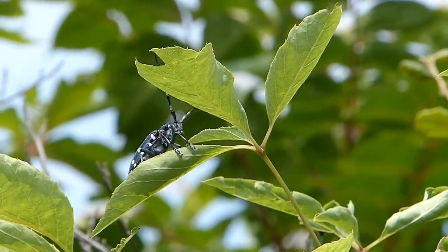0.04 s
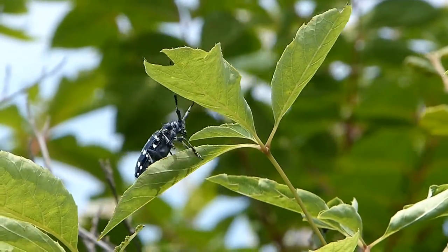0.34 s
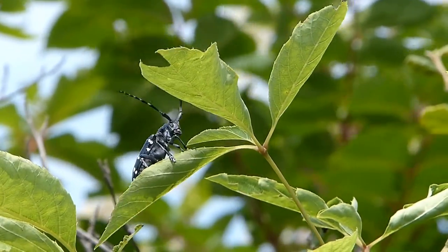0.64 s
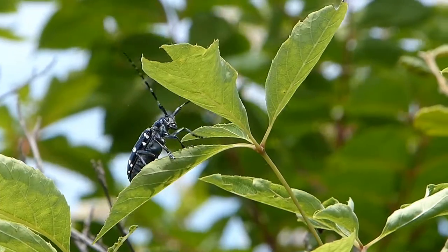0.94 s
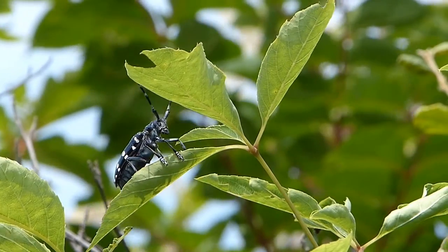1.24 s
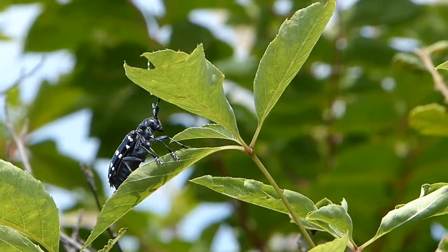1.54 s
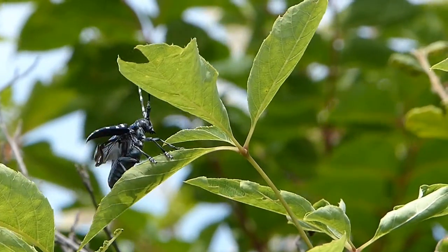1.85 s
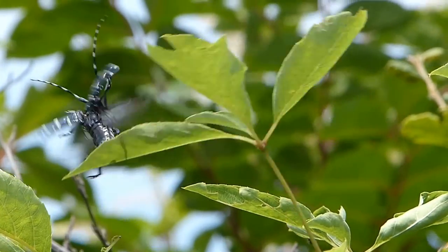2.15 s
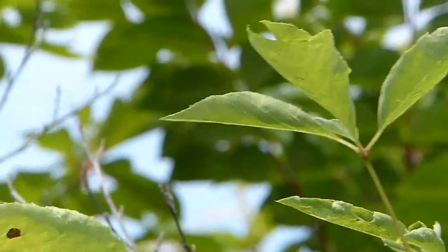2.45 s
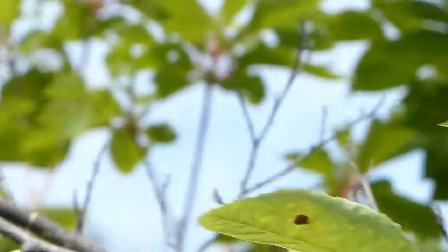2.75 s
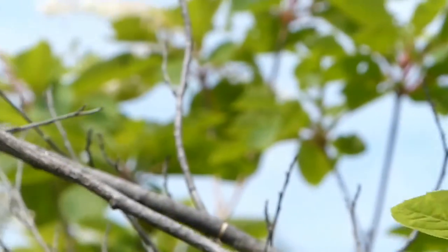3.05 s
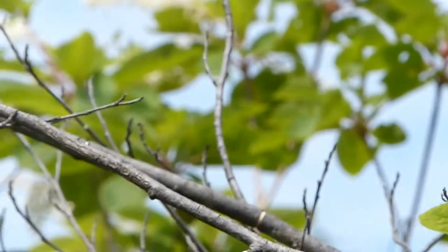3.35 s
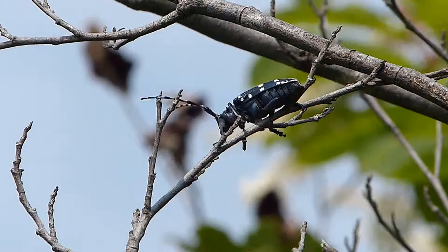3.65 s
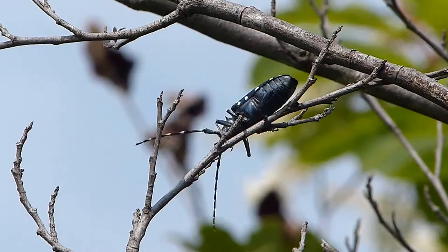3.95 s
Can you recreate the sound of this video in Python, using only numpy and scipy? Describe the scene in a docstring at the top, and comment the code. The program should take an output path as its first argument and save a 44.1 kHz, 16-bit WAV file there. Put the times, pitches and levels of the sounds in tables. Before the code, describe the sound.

Cicadas buzz loudly throughout, near ones rattling shrilly over a distant chorus and swelling around 2.5 seconds. A higher insect lisps about five times a second. Underneath, a camera lens whirrs faintly, with a few dry ticks before 1.5 seconds and soft stepping from 2.5 to 3.5. At 3.65 the sound cuts out for a tenth of a second, returning with a soft thump and one faint, distant bird chirp.

```python
"""Cicadas in summer trees. The nearest snap their tymbals in double clicks about 48 times a second,
ringing their hollow bodies over a chorus of others, scattered by the leaves. A higher insect lisps five
times a second; a far bird chirps once. A camera's lens drive whirrs and steps faintly in its case, with
a few dry ticks, over outdoor air and a low hum. Near the end the sound drops out for a tenth of a second
and returns with a soft thump."""
import sys
import numpy as np
from scipy import signal
from scipy.fft import rfft, irfft, next_fast_len
from scipy.io import wavfile
from scipy.ndimage import uniform_filter1d

SR = 44100
rng = np.random.default_rng(int(sys.argv[2]) if len(sys.argv) > 2 else 0)


def wav_out(sig):
    """Save sig, one row per channel (or a flat mono array), as 16-bit PCM at SR to the path in sys.argv[1]."""
    wavfile.write(sys.argv[1], SR, np.round(np.clip(np.atleast_2d(sig).T, -1, 1) * 32767).astype(np.int16))


N = 176400

# Near cicadas, pace from song start to end (time [s], stroke rate [1/s])
LEAD_PACE = [(.0195, 48.62), (.8, 48.53), (1.8, 48.54), (2.15, 48.67), (2.6, 48.42), (3.65, 48.40)]
RIVAL_PACE = [(.0139, 48.45), (1.0, 48.36), (1.5, 48.4)]
THIRD_PACE = [(1.9193, 47.0), (2.36, 47.0)]
FOURTH_PACE = [(3.3532, 47.8), (3.65, 47.7)]
LATE_PACE = [(3.7541, 47.6), (3.85, 48.0), (4.02, 47.2)]
# Near cicadas, song strength (time [s], level [dB])
LEAD_LEVEL = [(0, -14), (.5, -8), (.85, -4.5), (1.4, -3.5), (1.6, -6), (2.0, -9.5), (2.3, -2), (2.5, 2.5),
              (2.9, 1), (3.2, -2.5), (3.6, -2)]
RIVAL_LEVEL = [(0, -1.5), (.25, -1), (.5, -1), (.7, -.5), (1.0, -4), (1.27, -3), (1.5, -8.5)]
THIRD_LEVEL = [(1.92, -9), (1.96, -5), (2.1, -10.5), (2.3, -7), (2.36, -17)]
FOURTH_LEVEL = [(3.35, -6), (3.4, -2), (3.5, -4), (3.6, 1.5), (3.65, -10)]
LATE_LEVEL = [(3.75, 0.77), (4, 1.4)]
# Clicks of one tymbal stroke (lag from first strong click [s], level [dB])
STROKE_CLICKS = [(-.0025, -17), (0, -4), (.0024, -2), (.005, -14.5)]
# Colour around the body ring: in the open, behind leaves, late singer (frequency [Hz], gain [dB])
OPEN_EQ = [(1000, -43), (2800, -27.5), (3500, -17), (4200, -12), (4900, -8), (5600, -2), (6500, 4.5),
           (7450, 2), (8000, -6), (8600, -4), (10000, -18.5), (14000, -32)]
SHADED_EQ = [(1000, -50), (2800, -41), (3500, -25.5), (4200, -6.5), (4900, 1), (5600, -0.5), (6500, -6.5),
             (7450, 3), (8000, -8), (10000, -19.5), (14000, -31)]
LATE_EQ = [(1000, -40), (2800, -19.5), (3500, -12.5), (4200, -5), (4900, -5.5), (5600, -1.5), (6500, 2),
           (7450, 3.5), (8000, 1.5), (8600, 1), (10000, -17), (14000, -27.5)]
# Chorus cicadas (stroke rate [1/s], body pitch [Hz], level [dB])
FAR_CICADAS = [(47.68, 4886, -1), (47.3, 4720, -6), (47.64, 4760, -9), (45.95, 4810, -4.5),
               (49.16, 4610, 0), (47.4, 5410, -6.5), (45.93, 5100, -9.5), (50.7, 4670, -4)]
# Colour of the chorus voices and of the farthest, merged ones (frequency [Hz], gain [dB])
CHORUS_EQ = [(1500, -50), (2800, -23), (3350, -18.5), (3800, -6.5), (4300, -5.5), (4900, 1.5), (5400, 0),
             (6000, -1), (6700, -6), (7500, -4.5), (8200, -10), (10500, -19), (12500, -28), (14000, -51)]
HAZE_EQ = [(1500, -64), (2800, -28.5), (3400, -20), (4000, -6.5), (4900, 0.5), (5600, -1.5), (6500, -9),
           (7500, -12), (8200, -19), (10500, -24.5), (12500, -43), (14000, -62)]
# Chorus swell (time [s], level [dB], left minus right [dB])
CHORUS_SWELL = [(0, -40, 2), (.25, -40, -0.73), (.55, -41, -1), (.85, -38, -1.5), (1.3, -39.5, -1),
                (1.6, -40.5, 0.26), (1.9, -41, -0.74), (2.2, -40, -0.28), (2.6, -39.5, 1.2),
                (3.0, -39.5, 0.68), (3.45, -38, -.5), (3.64, -41, 0.29), (3.76, -43.5, -1.5), (4, -41.5, 0)]
# Lisps of the high insect (peak time [s], length [s], level [dB])
LISP_EVENTS = [(0.086, 0.1, -8), (0.312, 0.15, -11), (0.553, 0.22, -8), (0.775, .13, -4), (0.981, 0.1, -2),
               (1.173, 0.16, -7), (1.38, 0.18, -9), (1.606, 0.21, -14), (1.784, 0.18, -9),
               (1.972, 0.13, -7.5), (2.16, 0.11, -4.5), (2.357, 0.089, -4.5), (2.551, 0.079, -0.5),
               (2.744, 0.085, -3), (2.924, .1, -2), (3.126, 0.088, -2), (3.331, 0.083, -2),
               (3.533, 0.13, -6.5), (3.898, 0.091, -2)]
# Lisp colour (frequency [Hz], gain [dB])
LISP_EQ = [(7500, -14.5), (9000, -4.5), (9700, 1.5), (10000, 2), (10400, 1), (11200, -2), (12400, -6.5),
           (13200, -27), (15000, -40), (16000, -46.5)]
# Lens drive effort (time [s], level [dB])
DRIVE_EFFORT = [(0, 1), (.2, -2.5), (.45, -0.5), (.58, 0), (.7, -2), (1.4, 0.5), (1.7, -2), (2.35, -1),
                (2.48, 6.5), (2.6, 1), (2.9, 2), (3.2, 2), (3.53, 2), (3.63, 1), (4, 2)]
# Whirr colour (frequency [Hz], gain [dB])
WHIRR_EQ = [(60, -33), (150, -12), (260, 5), (600, 2), (1000, -1), (1250, -3.5), (1700, -9), (2600, -19.5),
            (5000, -29.5)]
# Case modes under the whirr (frequency [Hz], width [Hz], antiphase level [dB], in-phase level [dB])
CASE_MODES = [(269.4, 31, -17, -24.5), (589.5, 29, -13, -8), (717, 39, -0.5, -14), (793, 73, -9, -9),
              (851, 68, -5, -12), (956, 22, -1.5, -13.5), (1057, 43, -5.5, -15.5)]
# Case modes under a step (frequency [Hz], decay [s], antiphase level [dB], in-phase level [dB])
CASE_STEP_MODES = [(719, 0.0071, 2, -15), (806, .007, -4, -1.5), (965, 0.0052, 7.5, -13)]
# Lens: focus hunting strength, single hard steps, short moves (time [s], level [dB])
HUNT_LEVEL = [(2.56, -3), (2.75, -2), (2.9, 1), (3.18, 1), (3.3, -1), (3.46, -6)]
LENS_JOLTS = [(.108, 5), (.559, -3), (.594, 1.5), (1.109, -1), (2.412, -4), (2.475, 1), (2.488, 5),
              (2.796, 5.5), (2.946, 3), (2.988, 6), (3.140, 2.5), (3.506, 7)]
LENS_MOVES = [(.1, -4), (.49, -5), (.59, -4), (1.11, 0), (1.62, 3), (1.79, 3), (1.905, 1), (2.085, 0),
              (2.238, 3), (2.475, 3), (2.79, -3), (3.16, 1)]
# Dry ticks (time [s], level [dB])
TICK_EVENTS = [(.11, -2), (.328, -6), (.585, -15), (1.225, -4), (1.275, 0), (1.49, 0.5)]
# Colour of the ticks and of the air (frequency [Hz], gain [dB])
TICK_EQ = [(500, -15), (1300, -5), (2200, -4), (3500, -8), (8000, -31)]
AIR_EQ = [(25, -8), (70, -5.5), (120, 0), (170, -1.5), (500, 4), (900, -7.5), (1300, 0.5), (2500, -7.5),
          (6000, -19.5)]


def near_cicada(pace, level, body_eq, body_hz, pan_db, jitter_s=.00005, scatter_db=2.54):
    """Each tymbal stroke: two sharp falling clicks between weaker ones, ringing the hollow body."""
    t = np.arange(pace[0][0], pace[-1][0], 1 / SR)
    cycles = np.cumsum(curve(pace, t)) / SR
    stroke_s = np.interp(np.arange(cycles[-1]), cycles, t)[:, None]
    lag_s, click_db = np.array(STROKE_CLICKS).T
    jitter, scatter = rng.standard_normal((2, len(stroke_s), len(lag_s)))
    snap_db = curve(level, stroke_s)[:, None] + click_db + scatter_db * scatter
    snaps = clicks(stroke_s + lag_s + jitter_s * jitter, snap_db)
    body = colour(mode(sag(snaps), body_hz, decay_s=.00055), body_eq)
    return undb(-18) * pan(pan_db) * leaves(body, t60_s=.037, tail_db=-4.5)


def far_cicada(rate_hz, body_hz, ribs=5, strokes=230, rib_gap_s=.0029, rib_fade_db=2.4,
               jitter_s=.0002, scatter_db=2):
    """Each stroke buckles a run of ribs; their clicks ring the body."""
    rib = np.arange(ribs)
    jitter, scatter = rng.standard_normal((2, strokes, ribs))
    stroke_s = (np.arange(strokes)[:, None] - rng.random()) / rate_hz
    snap_s = stroke_s + rib * rib_gap_s + jitter_s * jitter
    snaps = clicks(snap_s, scatter_db * scatter - rib_fade_db * rib)
    return unit(mode(sag(snaps), body_hz, decay_s=.00077))


def chorus():
    """Far cicadas blurred by the trees, the farthest merged to a hiss; all swell and ebb together."""
    voices = sum(undb(db) * leaves(far_cicada(rate_hz, body_hz), t60_s=.14, tail_db=-5.5)
                 for rate_hz, body_hz, db in FAR_CICADAS)
    haze = undb(-5) * unit(colour(stereo_noise(width=.8), HAZE_EQ))
    swell_db, pan_db = curve(CHORUS_SWELL)
    return (unit(colour(voices, CHORUS_EQ)) + haze) * undb(swell_db) * pan(pan_db)


def lisping_insect(rise_share=.5, fall_share=.38, steepness=6.4, bed_db=-6.5, grain_db=.5):
    """Short swells of very high, grainy rasping over a steady bed of farther insects."""
    t = np.arange(N) / SR
    swell = undb(bed_db)
    for peak_s, length_s, db in LISP_EVENTS:
        away = np.maximum((peak_s - t) / rise_share, (t - peak_s) / fall_share) / length_s
        swell = swell + undb(db) * np.exp(-np.minimum(away, 2) ** steepness)
    rasp = stereo_noise(width=1) * undb(grain_db * walk(rate_hz=700))
    return undb(-54.5) * pan(3) * swell * unit(colour(rasp, LISP_EQ))


def lens_drive(flutter_db=1.5):
    """A fluttering whirr rings the camera case, shaking its two ports mostly in antiphase."""
    effort_db = curve(DRIVE_EFFORT)
    case = 0
    for hz, width_hz, antiphase_db, inphase_db in CASE_MODES:
        push = rng.standard_normal((2, N)) * undb(effort_db + flutter_db * walk(rate_hz=30))
        side, mid = unit(mode(push, hz, decay_s=1 / (np.pi * width_hz)))
        case = case + undb(antiphase_db) * antiphase(side) + undb(inphase_db) * mid
    whirr = unit(colour(rng.standard_normal(N), WHIRR_EQ)) * undb(.4 * effort_db)
    return undb(-58.5) * case + undb(-55.5) * antiphase(whirr)


def lens_steps(hunt_start_s=2.5715, period_s=.05, pair_gap_s=.0172, push_s=.0014, scatter_db=2):
    """Focus hunting: a purr of paired steps, plus single hard jolts. Each step rings the case."""
    pair_s = np.arange(hunt_start_s, HUNT_LEVEL[-1][0], period_s)[:, None] + [0, pair_gap_s]
    pair_db = curve(HUNT_LEVEL, pair_s) + scatter_db * rng.standard_normal(pair_s.shape)
    steps = clicks(pair_s, pair_db) + clicks(*np.array(LENS_JOLTS).T)
    t = np.arange(SR // 10) / SR
    attack = 1 - np.exp(-(t / push_s) ** 2)
    case = 0
    for hz, decay_s, antiphase_db, inphase_db in CASE_STEP_MODES:
        tone = attack * np.exp(-t / decay_s + 2j * np.pi * hz * t)
        response = undb(inphase_db) * tone.real + undb(antiphase_db) * antiphase(tone.imag)
        case = case + ring(steps, response)
    return undb(-47) * case


def lens_moves(rise_s=.0082):
    """Each short lens move rubs a low case resonance."""
    t = np.arange(SR // 5) / SR
    push = ring(clicks(*np.array(LENS_MOVES).T), t / rise_s * np.exp(1 - t / rise_s))
    rub = unit(mode(rng.standard_normal(N), hz=578, decay_s=.016))
    return undb(-59) * push * rub


def ticks(decay_s=.0057):
    """Faint dry ticks, as of fingers on the camera."""
    t = np.arange(SR // 10) / SR
    touch = ring(clicks(*np.array(TICK_EVENTS).T), np.exp(-t / decay_s))
    return undb(-54.5) * touch * unit(colour(rng.standard_normal((2, N)), TICK_EQ))


def bird(start_s=3.783, length_s=.085, start_hz=2850, rise_hz_per_s=10500):
    """One faint, far, rising chirp."""
    t = np.clip(np.arange(N) / SR - start_s, 0, length_s)
    hz = start_hz + rise_hz_per_s * t
    return undb(-60.5) * np.sin(np.pi * t / length_s) * np.sin(2 * np.pi * np.cumsum(hz) / SR)


def air(hum_hz=121, waver_share=.0191):
    """Faint, even outdoor noise with a low, wavering hum."""
    hz = hum_hz * (1 + waver_share * walk(rate_hz=6.12))
    hum = np.sqrt(2) * np.sin(2 * np.pi * np.cumsum(hz) / SR)
    return undb(-63.5) * unit(colour(stereo_noise(width=.51), AIR_EQ)) + undb(-83) * hum


def sag(x, delay_s=.001204, corner_hz=4865):
    """Delay the lows, so each click sweeps down in pitch."""
    size = next_fast_len(N + 4096)
    hz = np.arange(size // 2 + 1) * SR / size
    lag_s = delay_s / (1 + (hz / corner_hz) ** 10)
    phase_rad = 2 * np.pi * np.cumsum(lag_s) * SR / size
    return irfft(rfft(x, size) * np.exp(-1j * phase_rad), size)[:N]


def leaves(x, t60_s, tail_db):
    """Direct sound plus a short scatter off foliage, different at each ear."""
    t = np.arange(SR // 4) / SR
    tail = rng.standard_normal((2, len(t))) * np.exp(-np.log(1000) * t / t60_s)
    tail /= np.sqrt(np.sum(tail ** 2, axis=1, keepdims=True))
    return x + undb(tail_db) * ring(x, tail)


def clicks(times_s, db):
    """Impulses at given times and levels."""
    at = np.round(times_s * SR).astype(int).ravel()
    inside = (at >= 0) & (at < N)
    return np.bincount(at[inside], undb(db).ravel()[inside], N)


def mode(x, hz, decay_s):
    """One damped resonance."""
    t = np.arange(int(10 * decay_s * SR)) / SR
    return ring(x, np.exp(-t / decay_s) * np.sin(2 * np.pi * hz * t))


def ring(x, response):
    """Convolve with an impulse response."""
    return signal.fftconvolve(np.atleast_2d(x), np.atleast_2d(response), axes=1)[:, :N]


def colour(x, eq):
    """Zero-phase filter through (frequency [Hz], gain [dB]) points."""
    hz, db = np.array(eq, float).T
    size = next_fast_len(N + 4096)
    bin_hz = np.arange(size // 2 + 1) * SR / size
    gain = undb(np.interp(np.log(bin_hz + 1), np.log(hz), db))
    return irfft(rfft(np.atleast_2d(x), size) * gain, size)[:, :N]


def stereo_noise(width):
    """Common white noise plus a separate part per ear."""
    return rng.standard_normal(N) + width * rng.standard_normal((2, N))


def walk(rate_hz):
    """Smooth random drift, rms 1."""
    hold = max(int(SR / rate_hz), 1)
    stairs = np.repeat(rng.standard_normal(N // hold + 1), hold)
    return unit(uniform_filter1d(stairs, hold)[:N])


def curve(rows, at_s=None):
    """Table columns, interpolated linearly in time."""
    times_s, *columns = np.array(rows, float).T
    at_s = np.arange(N) / SR if at_s is None else at_s
    return np.squeeze([np.interp(at_s, times_s, column) for column in columns])


def pan(db):
    """Channel gains for a left-minus-right level."""
    return undb(np.array([db, -db]).reshape(2, -1) / 2)


def antiphase(x):
    """Left as is, right inverted."""
    return x * np.array([[1], [-1]])


def undb(db):
    """Decibels to gain."""
    return 10 ** (np.asarray(db) / 20)


def unit(x):
    """Scale to rms 1."""
    return x / np.sqrt(np.mean(x ** 2))


def scene():
    """Five near cicadas, chorus, high insect, bird, camera and air."""
    near = (near_cicada(LEAD_PACE, LEAD_LEVEL, OPEN_EQ, body_hz=4904, pan_db=-1.5)
            + near_cicada(RIVAL_PACE, RIVAL_LEVEL, SHADED_EQ, body_hz=4980, pan_db=-2.5)
            + near_cicada(THIRD_PACE, THIRD_LEVEL, SHADED_EQ, body_hz=4860, pan_db=-1)
            + near_cicada(FOURTH_PACE, FOURTH_LEVEL, SHADED_EQ, body_hz=4860, pan_db=0)
            + near_cicada(LATE_PACE, LATE_LEVEL, LATE_EQ, body_hz=4710, pan_db=-1.5))
    wildlife = near + chorus() + lisping_insect() + bird()
    camera = lens_drive() + lens_moves() + lens_steps() + ticks()
    return wildlife + camera + air()


def record(dry, off_s=3.648, on_s=3.7545, fade_s=.008, thump_decay_s=.19, top_hz=15600):
    """The sound drops out briefly and returns with a soft thump; the top treble is cut."""
    t = np.arange(N) / SR
    gate = np.clip((off_s - t) / fade_s, 0, 1) + (t >= on_s)
    thump = -undb(-49) * (t >= on_s) * np.exp(-np.abs(t - on_s) / thump_decay_s)
    lowpass = signal.ellip(12, .2, 70, top_hz, fs=SR, output="sos")
    return signal.sosfilt(lowpass, dry * gate + thump)


dry = scene()
out = record(dry)
wav_out(out)
```